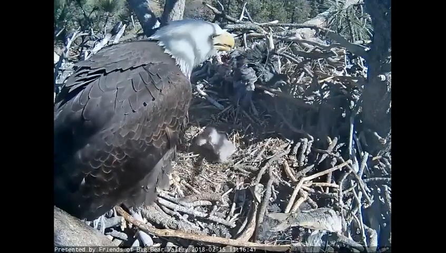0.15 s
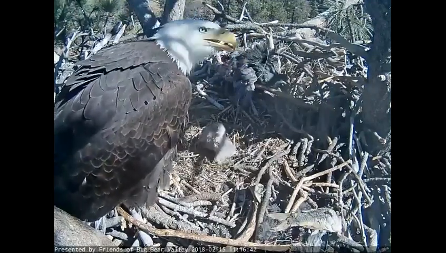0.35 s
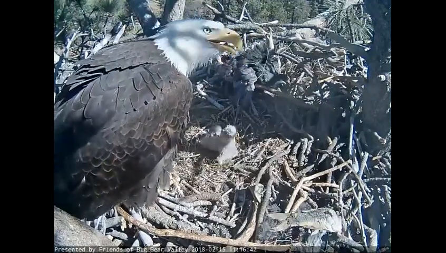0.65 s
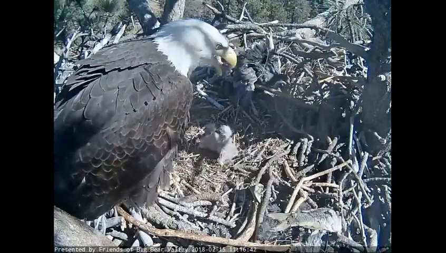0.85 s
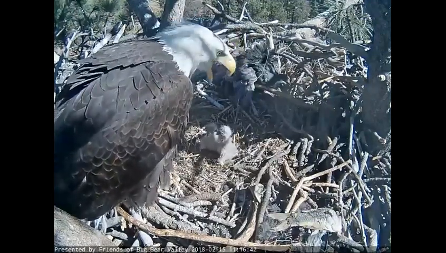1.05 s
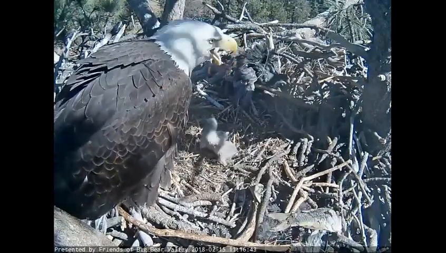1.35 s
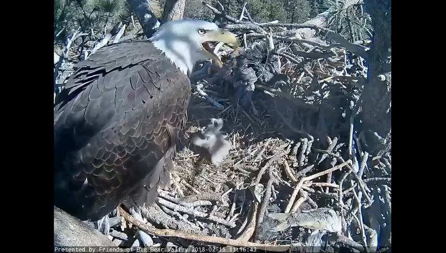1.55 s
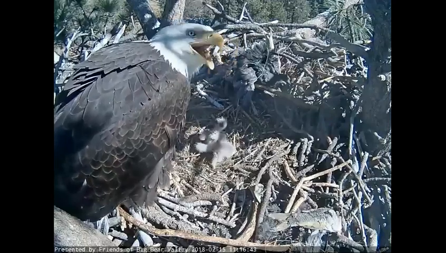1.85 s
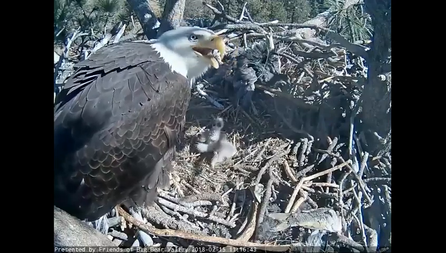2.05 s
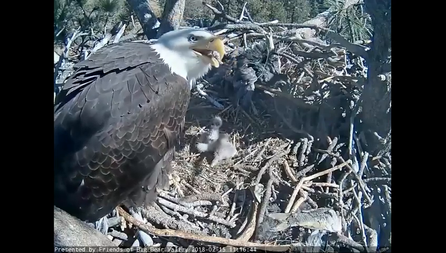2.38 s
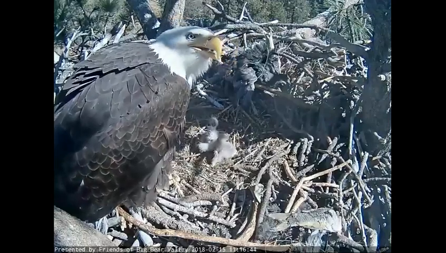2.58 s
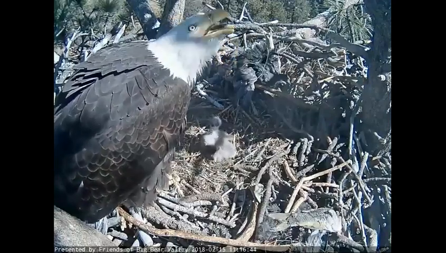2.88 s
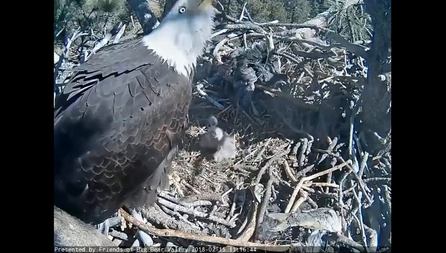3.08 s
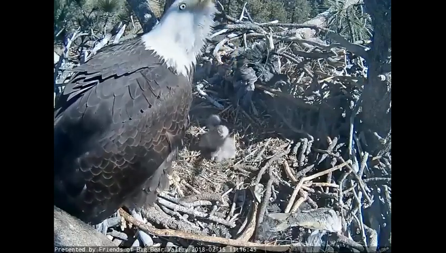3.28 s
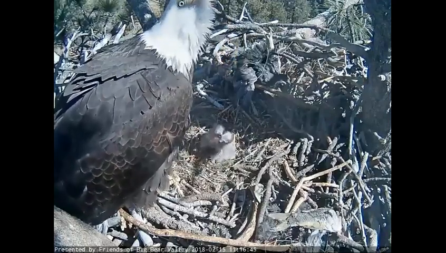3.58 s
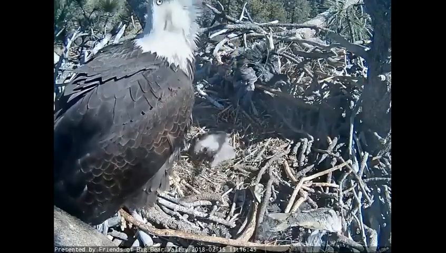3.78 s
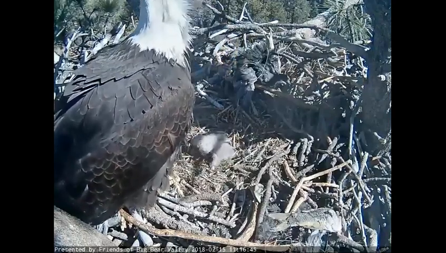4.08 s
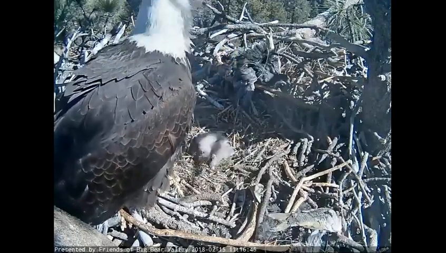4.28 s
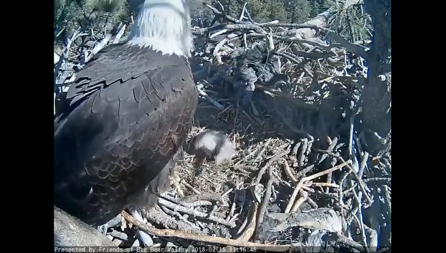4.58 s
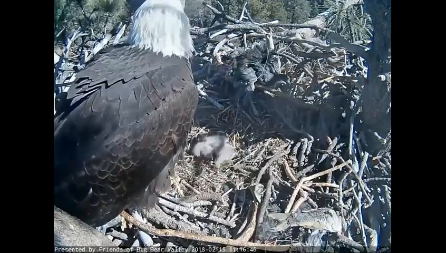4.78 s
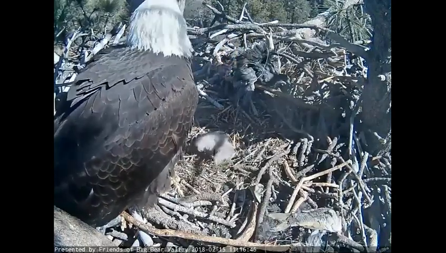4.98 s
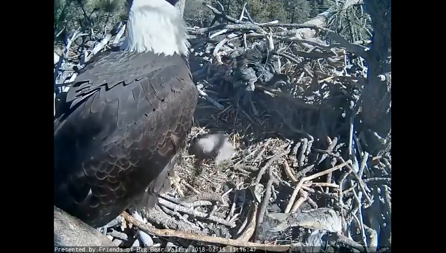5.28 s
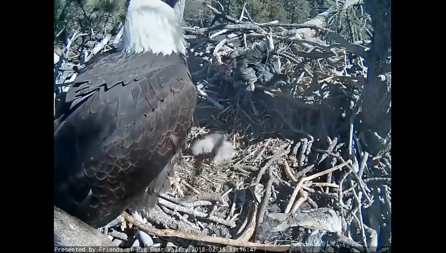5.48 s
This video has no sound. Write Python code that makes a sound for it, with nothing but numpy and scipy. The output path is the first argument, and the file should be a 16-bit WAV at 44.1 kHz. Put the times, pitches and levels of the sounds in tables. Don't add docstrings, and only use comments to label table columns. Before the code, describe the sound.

Two eagles call at a nest: long rising whistles overlap fast piercing yelps, with faint echoes, low wind and narrow, overloaded microphone sound.

```python
import sys
import numpy as np
from scipy import signal
from scipy.fft import rfft, irfft
from scipy.io import wavfile
from scipy.ndimage import uniform_filter1d

SR = 44100
rng = np.random.default_rng(int(sys.argv[2]) if len(sys.argv) > 2 else 0)


def unload_wav(signal):
    wavfile.write(
        sys.argv[1],
        SR,
        np.round(np.clip(np.atleast_2d(signal).T, -1, 1) * 32767).astype(np.int16),
    )


def field_ratio(decibels):
    return 10 ** (np.asarray(decibels, dtype=float) / 20)


N = 248283


def evened(x):
    return x / np.sqrt(np.mean(x ** 2) + 1e-20)


def read(points, hz):
    f, value = np.transpose(points)
    return np.interp(np.log(hz + 1), np.log(f + 1), value)


def add(mix, s, sound):
    part = mix[round(s * SR):][:len(sound)]
    part += sound[:len(part)]


def coloured(x, gain):
    return irfft(rfft(x) * gain(np.fft.rfftfreq(len(x), 1 / SR)), len(x))


def noise(size, gain):
    return coloured(rng.standard_normal(size), gain)


def wobble(size, hz):
    return evened(noise(size + 4096, lambda f: np.exp(-(f / hz) ** 2)))[:size]


def columns(rows):
    s, *rest = np.transpose(rows)
    t = np.arange(s[0], s[-1], 1 / SR)
    return t, [np.interp(t, s, c) for c in rest]


def partial(turns, db, flutter_db, flutter_hz):
    waver = flutter_db * wobble(len(turns), flutter_hz)
    drift = .12 * flutter_db * wobble(len(turns), flutter_hz)
    return np.sqrt(2) * field_ratio(db + waver) * np.cos(2 * np.pi * turns + drift)


def whistle(rows, octave_db, half_db, low_db, split):
    t, (hz, db, high_db) = columns(rows)
    low_db = high_db + low_db
    roughness = np.minimum(field_ratio(1.5 * (high_db - db)), 1)
    db = db + 9.0 * roughness * wobble(len(t), 82)
    since = t - t[0]
    vibrato_hz, vibrato_depth = 40.714, .0115
    trill = np.exp(-since / .8) * np.sin(2 * np.pi * vibrato_hz * since)
    turns = np.cumsum(hz * (1 + vibrato_depth * trill)) / SR

    full_db = -6.5
    swelled_db = np.minimum(db + np.clip(db + 19, 0, 6), full_db)
    tone = partial(turns, swelled_db + .9 * trill, .7, 40)
    tone += partial(2 * turns, db + octave_db + 7.5 * trill, 1.5, 50)

    half_db = half_db + 0.79 * (db + 19.5)
    halves = partial(turns / 2, half_db, 1.5, 60)
    halves += partial(3 * turns / 2, half_db + 9, 3.5, 120)

    split_partials = partial((1 - split) * turns, low_db - 21, 5.2, 70)
    split_partials += partial(split * turns, low_db, 3.4, 90)
    split_partials += partial((2 - split) * turns, high_db - 2.5, 4.0, 160)
    split_partials += partial((1 + split) * turns, high_db, 2.2, 70)

    hiss = noise(len(t), lambda f: np.exp(-((f - 2950) / 520) ** 2))
    rasp = field_ratio(high_db - 6.5) * evened(hiss)
    from_start = since + (t[0] == 0)
    fade = np.clip(np.minimum(t[-1] - t, from_start) / .006, 0, 1)
    return t[0], (tone + halves + split_partials + rasp) * fade


# t/s, pitch f/Hz, effort level/dB, upper split partial level/dB
WHISTLE_CALLS = [
    [(0.0, 1883, -24.5, -58), (.09, 1904, -25.5, -37), (.25, 1950, -19, -35.5), (.365, 2014, -13.5, -40.5),
     (.43, 2058, -14.5, -43), (.454, 2099, -40, -42)],
    [(1.025, 1890, -30, -50.5), (1.1, 1885, -21.5, -42), (1.29, 1917, -19.5, -30.5),
     (1.4, 1946, -17.5, -37), (1.49, 1980, -12, -46), (1.562, 2031, -12, -46), (1.597, 2098, -32, -40.5)],
    [(2.135, 1843, -45.5, -70.5), (2.15, 1848, -22, -62), (2.215, 1865, -22, -33.5),
     (2.28, 1889, -20, -51.5), (2.42, 1936, -18.5, -30), (2.485, 1980, -12.5, -42), (2.6, 2007, -12.5, -41),
     (2.633, 2019, -12.5, -27), (2.677, 2014, -13.5, -48)],
    [(3.945, 1849, -55, -90), (4.0, 1898, -28, -85.5), (4.14, 1959, -28, -72), (4.2, 2006, -34.5, -60),
     (4.26, 2023, -26, -36), (4.41, 2116, -20.5, -40.5), (4.47, 2147, -28, -33), (4.69, 2236, -33, -35)],
]
# octave against tone level/dB, half-pitch partials level/dB,
# lower against upper split partial level/dB, split as a share of the pitch
WHISTLE_VOICES = [(-13, -56.5, -12, .625), (-12, -60, -12, .65), (-10, -57, -11.5, .635),
                  (-20, -75, -2.5, .667)]


def whistles(birds):
    for rows, voice in zip(WHISTLE_CALLS, WHISTLE_VOICES):
        add(birds, *whistle(rows, *voice))


# t/s, depth level/dB
VOICE_CATCHES = [(.989, 14), (1.004, 11.5), (1.012, 8), (1.626, 20), (1.73, 8), (1.758, 20.5), (1.9, 7.5),
                 (2.959, 19.5), (2.975, 10), (2.987, 14), (3.4, 8.5), (4.535, 8), (4.588, 11.5),
                 (4.601, 11), (4.613, 12), (4.674, 21.5), (4.683, 18.5), (4.777, 11), (4.791, 6),
                 (4.806, 11.5), (4.907, 12), (5.002, 9.5), (5.025, 19), (5.147, 4.5), (5.307, 8.5)]


def yelp(s, length, db, first_hz, last_hz, kind, order):
    rise_s, sag_db, dying, waver_db, *shares_db = kind
    tail_s, tail_sag = .035, .025
    t = np.arange(0, length + tail_s, 1 / SR)
    after = np.maximum(t - length, 0)
    held = np.minimum(t / length, 1)

    hz = np.interp(t, [0, length], [first_hz, last_hz])
    hz = hz * (1 - tail_sag * np.minimum(after / 0.0085, 1))
    arch, jitter = .015, .006
    hz = hz * (1 + arch * (np.sin(np.pi * held) - .6) + jitter * wobble(len(t), 90))
    turns = np.cumsum(hz) / SR / order

    rise_db, drop_db = 13, 8
    db = db - sag_db * held + waver_db * wobble(len(t), 110)
    db = db - rise_db * np.maximum(1 - t / rise_s, 0)
    db = db - drop_db * np.minimum(after / 0.0022, 1) - dying * after
    onset_db = 16.5 * np.exp(-t / .012) * np.array([[.2], [.3], [1]])
    third_db, fourth_db, fifth_db = db + np.minimum(np.c_[shares_db] + onset_db, 0)

    note = partial(4 * turns, fourth_db, 1.1, 70)
    note += partial(3 * turns, third_db, 1.5, 80)
    note += partial(5 * turns, fifth_db, 1.5, 80)
    note += partial(6 * turns, fifth_db + 3, 2.5, 80)
    note += partial(2.3 * turns, third_db - 19.5, 4.0, 130)
    note += partial(2 * turns, np.maximum(fifth_db, third_db) - 28.5, 6.0, 130)
    breath = noise(len(t), lambda f: np.exp(-((f - 2900) / 800) ** 2))
    note += field_ratio(fourth_db - 25) * evened(breath)

    catch_db = sum(depth_db * np.exp(-((t + s - at) / 0.0017) ** 2) for at, depth_db in VOICE_CATCHES)
    edges = np.clip(np.minimum(t, t[-1] - t) / .003, 0, 1)
    return s, field_ratio(-catch_db) * note * edges


# t/s, length t/s, level/dB, leading partial first f/Hz, last f/Hz
NEAR_NOTES = [
    (1.034, .058, -4.5, 2900, 3006),
    (1.14, .043, -4, 3050, 3060),
    (1.232, .043, -5, 2980, 2979),
    (1.336, .035, -6.5, 2850, 2958),
    (1.468, .028, -10, 2924, 2938),
    (1.608, .028, -10.5, 2898, 2856),
]
FAR_NOTES = [
    (.972, 0.0587, -19, 2322, 2438),
    (1.724, 0.042314, -9.5, 2959, 2842),
    (4.483, .024, -15.5, 2630, 2670),
    (4.522, .02, -18.5, 2665, 2550),
    (4.659, 0.04113, -11, 2804, 2925),
    (4.759, 0.05753, -11.5, 2825, 2872),
    (4.875, 0.046397, -13, 2840, 2860),
    (4.992, 0.04401, -13, 2845, 2835),
    (5.133, 0.030187, -10.5, 2825, 2786),
]
HOARSE_NOTES = [
    (1.59, .02, -15.5, 3060, 2979),
    (1.886, 0.026398, -12.5, 2950, 2858),
    (2.056, 0.01759, -13.5, 2940, 2856),
    (5.108, .025, -26.5, 2900, 2833),
    (5.265, 0.02741, -13.5, 2880, 2761),
    (5.423, .017, -19, 2800, 2774),
    (5.588, 0.01784, -23.5, 2790, 2736),
]
RISING_NOTES = [
    (2.942, .034, -11.5, 2548, 2785),
    (2.976, 0.016485, -18.5, 2754, 2860),
    (3.368, .051, -10, 2519, 2806),
]
DULL_NOTES = [
    (1.91, 0.02612, -17, 2201, 2173),
    (2.071, .024, -12.5, 2129, 2093),
    (5.295, 0.021752, -20, 2152, 2129),
    (5.438, 0.02203, -22.5, 2052, 2016),
    (5.596, 0.020825, -25, 1998, 1980),
]
FLICK_NOTES = [
    (.458, .026, -19.5, 1994, 1767),
    (1.61, 0.022204, -22.5, 1965, 1764),
    (2.674, .018, -20, 1930, 1786),
]
BRIGHT_NOTES = [
    (2.926, 0.01689, -34, 3297, 3300),
    (2.976, 0.025357, -23, 3436, 3412),
    (3.419, .043, -13, 3413, 3504),
    (4.572, 0.05502, -21.5, 3306, 3409),
]
# rise t/s, sag level/dB while held, dying level/dB per s, waver level/dB,
# then 3rd, 4th and 5th partial level/dB against the note
NEAR_KIND = (0.017, 2.5, 450, 1.0, -29, 0, -35)
FAR_KIND = (.005, 5, 800, 1.3494, -32, 0, -33.5)
HOARSE_KIND = (0.0088, 0, 2500, 1.5, -10, 0, -25)
RISING_KIND = (0.0432, 0, 1499.5, 1.1428, -38, 0, -32)
DULL_KIND = (0.0218, 9, 800, 1.3541, 0, -17, -26)
FLICK_KIND = (0.2019, 0.5, 2999.5, 1.5, 2.5, -9, -11)
BRIGHT_KIND = (0.0007, 1, 1500, 1.5184, -36, -26.5, 0)


def yelps(birds):
    runs = ((NEAR_NOTES, NEAR_KIND, 4), (FAR_NOTES, FAR_KIND, 4), (HOARSE_NOTES, HOARSE_KIND, 4),
            (RISING_NOTES, RISING_KIND, 4), (DULL_NOTES, DULL_KIND, 3), (FLICK_NOTES, FLICK_KIND, 3),
            (BRIGHT_NOTES, BRIGHT_KIND, 5))
    for notes, kind, order in runs:
        for row in notes:
            add(birds, *yelp(*row, kind, order))


# f/Hz, level/dB
THROAT = [(450, -17), (900, -18.5), (1200, -4), (1600, 1), (2000, -0.5), (2500, -12), (3100, -10.5),
          (3700, -16)]


def croak(s, length, first_hz, last_hz, db):
    hz = np.linspace(first_hz, last_hz, round(length * SR))
    turns = np.cumsum(hz) / SR
    stack = sum(partial(k * turns, read(THROAT, k * hz), 2.8, 130) for k in range(1, 9))
    return s, field_ratio(db) * evened(stack) * np.hanning(len(hz)) ** 0.18


# t/s, length t/s, first f/Hz, last f/Hz, level/dB
CROAK_NOTES = [(0.945, .04, 444, 457.6, -32), (1.705, 0.016, 454.3, 523.8, -42),
               (1.864, 0.026, 400.2, 440.1, -44.5), (2.04, 0.016, 396.8, 448.7, -42),
               (2.353, 0.025, 588.5, 475.2, -24), (3.35, 0.026, 355.4, 406.7, -26.5),
               (4.747, 0.01661, 520, 682.5, -39.5), (4.863, 0.013885, 590, 660.2, -36),
               (4.977, 0.016, 600, 672.9, -41.5), (5.103, 0.017, 554.5, 641, -45.5),
               (0.94, 0.041, 543.8, 583.8, -37.5)]


def croaks(birds):
    for row in CROAK_NOTES:
        add(birds, *croak(*row))


# f/Hz, level/dB
SLOPE_COLOUR = [(1000, -8), (2000, -19.5), (2800, 0), (3500, -5)]


def slope_echo(x):
    t = np.arange(3 * SR) / SR
    facing = field_ratio(-3.5) * np.exp(-((t - .25) / 0.024) ** 2)
    dull, bright = rng.standard_normal((2, len(t))) * (1 - np.exp(-t / 0.058))
    tail = coloured(dull * field_ratio(-60 * t / 2.5), lambda f: f < 2300)
    tail += coloured(bright * (field_ratio(-60 * t / 2.2) + facing), lambda f: f >= 2300)
    tail = coloured(tail, lambda f: field_ratio(read(SLOPE_COLOUR, f)))
    return signal.fftconvolve(x, tail / np.linalg.norm(tail))[:N]


# f/Hz, level/dB
TWIG_COLOUR = [(240, -42), (400, -31), (818, -41.5), (952, 7), (2530, 7.5), (3800, 6), (4940, -47.5),
               (8360, -120)]


def rustle(s, length, crackle_db, thump_db):
    size = round(length * SR)
    snaps = rng.standard_normal(size) * field_ratio(6.443 * wobble(size, 320))
    crackle = evened(coloured(snaps, lambda f: field_ratio(read(TWIG_COLOUR, f))))
    thump = evened(coloured(snaps, lambda f: f / 60 / (1 + (f / 170) ** 3)))
    return s, (field_ratio(crackle_db) * crackle + field_ratio(thump_db) * thump) * np.hanning(size) ** .5


# t/s, length t/s, crackle level/dB, thump level/dB
NEST_MOVES = [
    (2.921, .03, -47.5, -56.5),
    (3.003, 0.0664, -37, -50),
    (3.044, 0.05141, -45.5, -40.5),
    (3.433, 0.027, -45, -44),
    (3.47, 0.044, -38, -40),
    (4.1, 0.04702, -50.5, -62.5),
]


def rustles(nest):
    for row in NEST_MOVES:
        add(nest, *rustle(*row))


# f/Hz, level/dB
WIND_COLOUR = [(5.9, -30), (10, 2), (27, -8), (190, -28.5), (600, -33), (1700, -45.5), (2210, -92),
               (3740, -120)]


def wind():
    rumble = evened(noise(N, lambda f: field_ratio(read(WIND_COLOUR, f))))
    return field_ratio(-41.5 + 0.47 * wobble(N, 4.5)) * rumble


def scene():
    birds, nest = np.zeros(N), np.zeros(N)
    whistles(birds)
    yelps(birds)
    croaks(birds)
    rustles(nest)
    return (birds + field_ratio(-23.5) * slope_echo(birds) + nest + wind())[None]


def narrow_band(f):
    droop_db = -3.5 * (f / 3000) ** 3
    return field_ratio(droop_db - 90 / (1 + np.exp((3935 - f) / 45)))


def roll_off(x):
    return signal.sosfilt(signal.butter(12, 16090, fs=SR, output="sos"), x)


def record(dry):
    x = np.pad(np.clip(dry[0], -.35, .35), (0, 2000))
    grit = rng.uniform(-1, 1, len(x))
    x = x + (abs(x) + .006) * field_ratio(-20) * grit
    x = coloured(x, narrow_band)
    haze = coloured(grit, lambda f: np.exp(-((f - 4200) / 550) ** 4))
    high = coloured(x, lambda f: 1 / (1 + (2400 / (f + 1)) ** 12))
    lean = 5.0 * uniform_filter1d((x - high) ** 2, size=1500) ** 2
    x = x + field_ratio(-25.5) * uniform_filter1d(abs(high), size=600) * haze
    offset, ceiling = 0.01284, 0.33642
    x = np.minimum(x + offset + lean, ceiling)[:N]
    return roll_off(x[None])


dry = scene()
out = record(dry)
unload_wav(out)
```